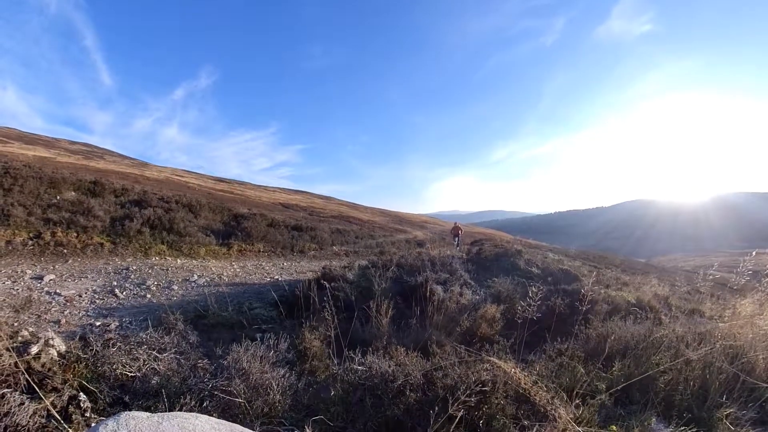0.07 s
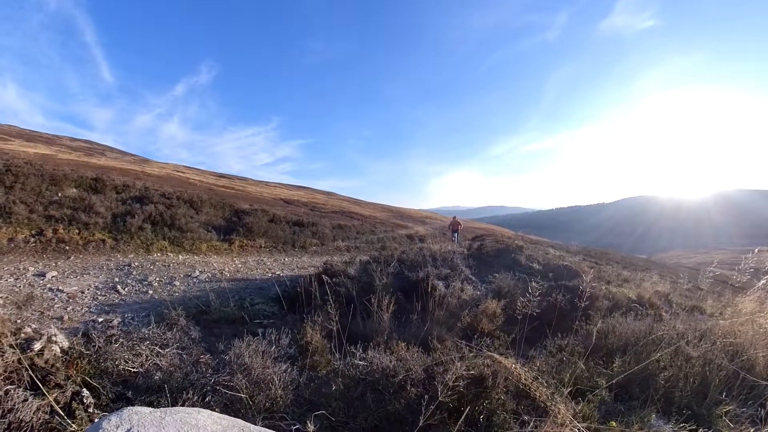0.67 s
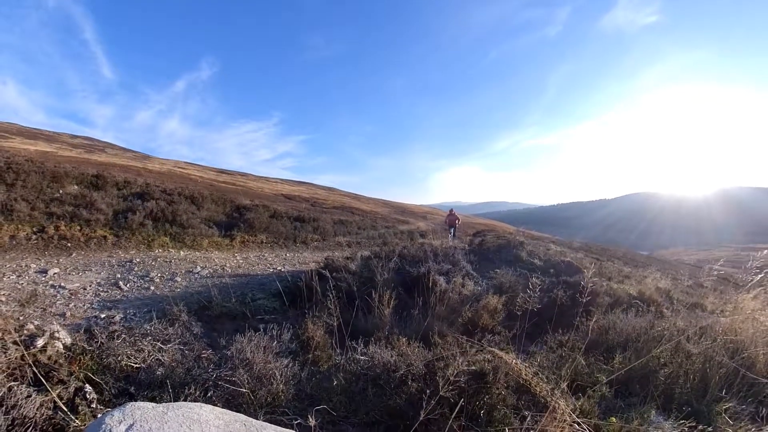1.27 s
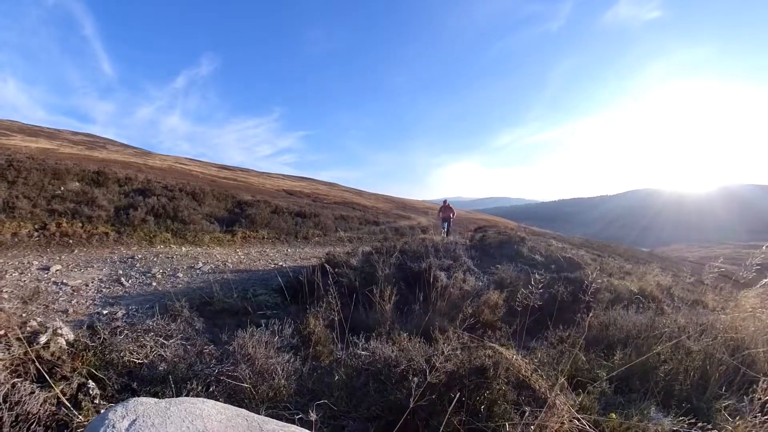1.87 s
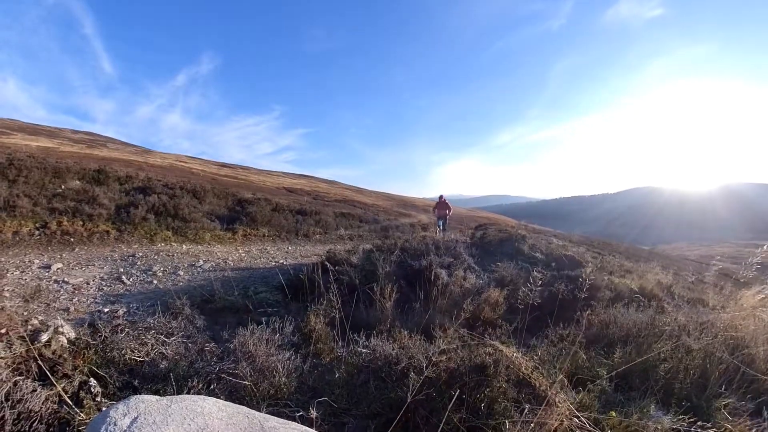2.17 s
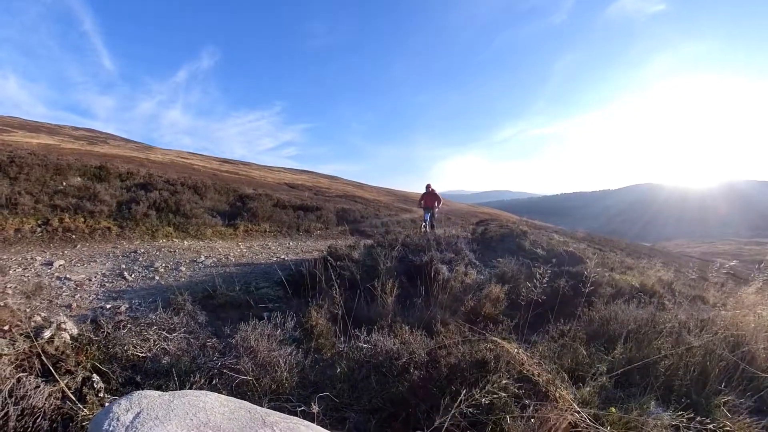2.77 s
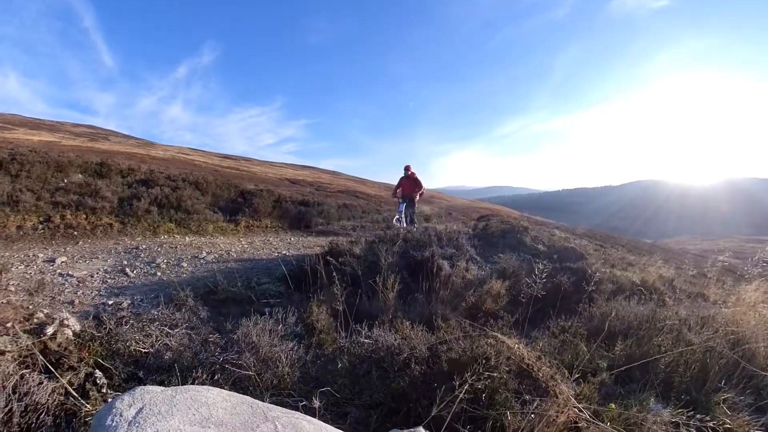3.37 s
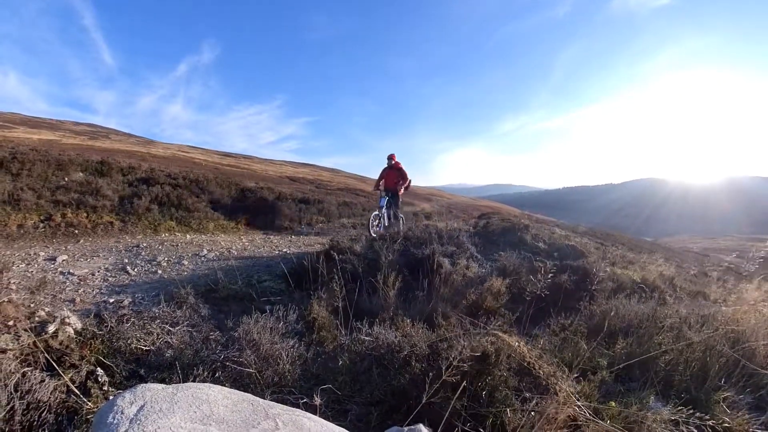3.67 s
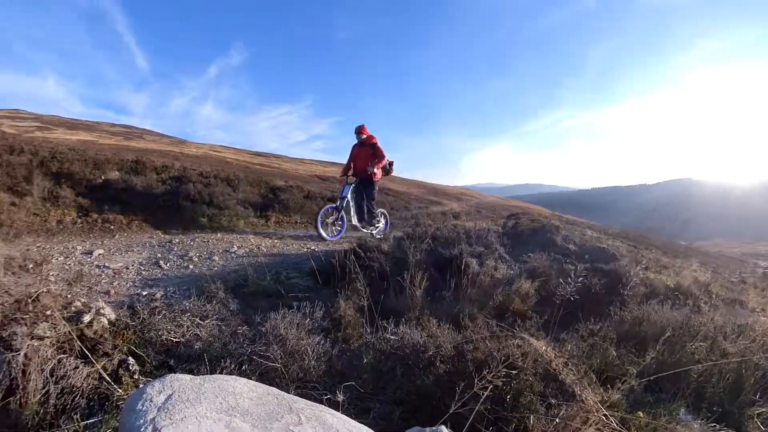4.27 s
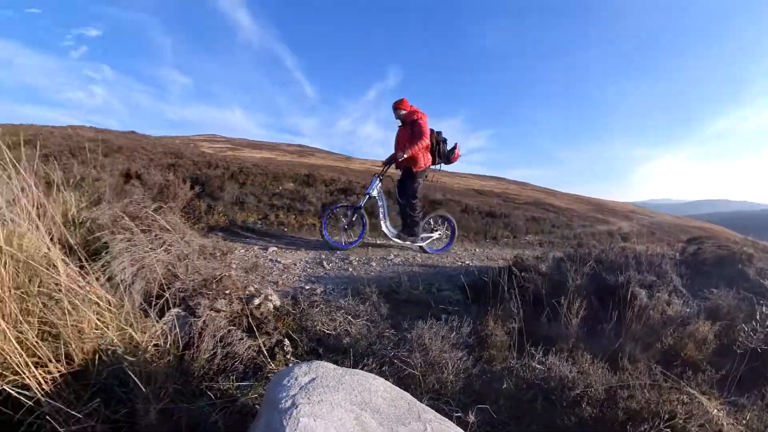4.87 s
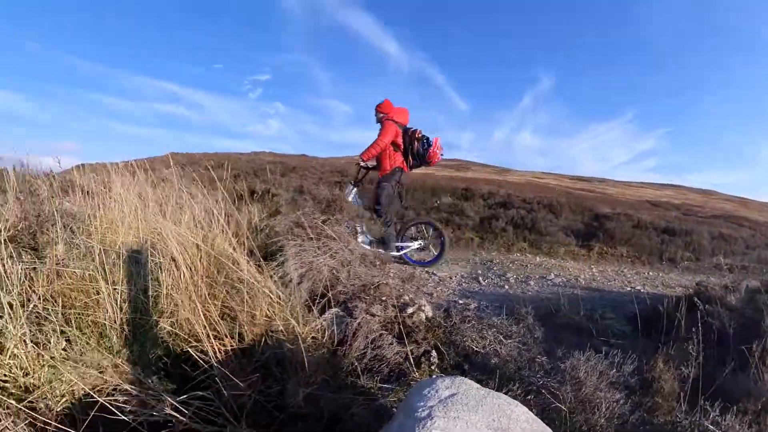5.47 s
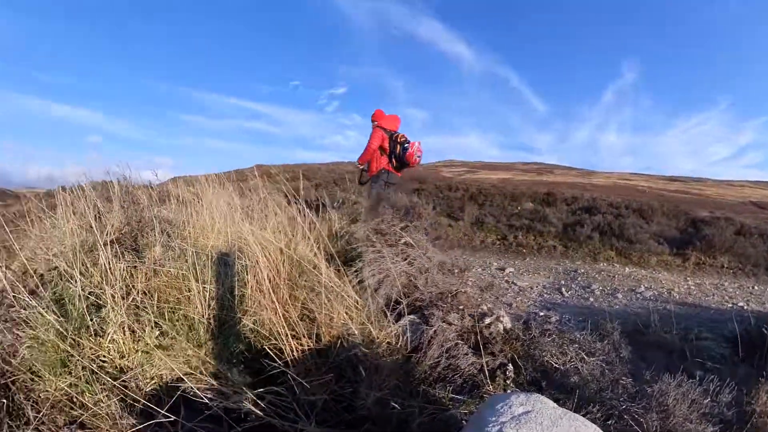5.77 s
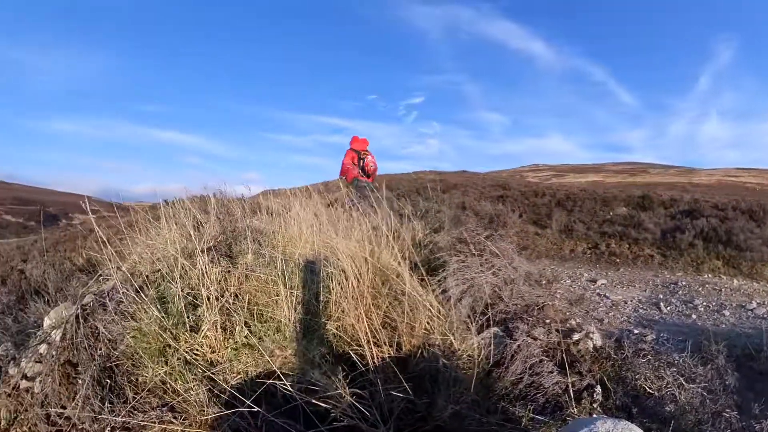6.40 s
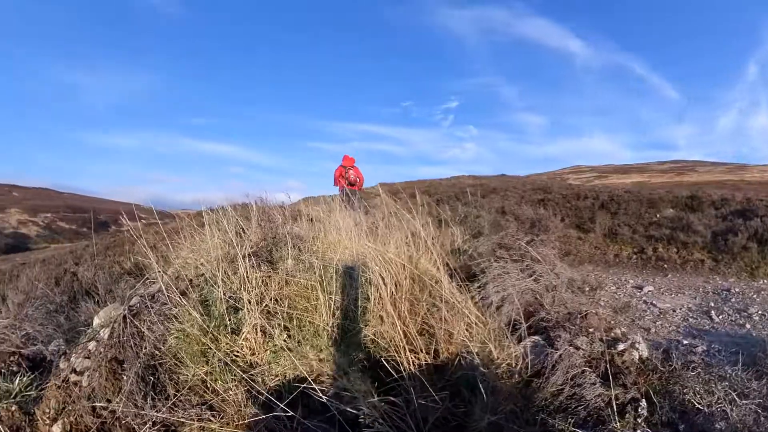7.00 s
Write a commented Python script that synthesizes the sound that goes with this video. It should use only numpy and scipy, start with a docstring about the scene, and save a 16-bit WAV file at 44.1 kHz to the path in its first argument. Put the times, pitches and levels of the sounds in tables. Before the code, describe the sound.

Wind thumps and rumbles on the microphone as scooter tyres approach over gravel, pass close and roll away.

```python
"""Kick scooter on windy gravel

A kick scooter rolls down a gravel track and passes a camera on an open hillside.
Its tyres crunch over packed stones, spray grit, flick stones and hum faintly when closest.
Gusts buffet the two microphone ports separately, over a deep rumble, with sharp pops
where an eddy hits one. Far air and a faint hiss lie underneath."""
import sys
import numpy as np
from scipy import signal
from scipy.fft import rfft, irfft
from scipy.io import wavfile
from scipy.ndimage import map_coordinates

SR = 44100
rng = np.random.default_rng(int(sys.argv[2]) if len(sys.argv) > 2 else 0)


def unload_wav(signal):
    """Save mono or channel-first audio to the path in sys.argv[1] as 16-bit WAV at rate SR, clipped to [-1, 1]."""
    wavfile.write(
        sys.argv[1],
        SR,
        np.round(np.clip(np.atleast_2d(signal).T, -1, 1) * 32767).astype(np.int16),
    )


N = 319284
TIME_S = np.arange(N) / SR
BINS_HZ = np.fft.rfftfreq(N, 1 / SR)
BAND_LIMIT_HZ = 9850
REF_GUST_DB = -50
CLOSEST_S, CLOSEST_M, SPEED_M_PER_S = 5.154, 2.83, 3.84

# scooter direction as the camera turns: (time [s], treble left minus right [dB], left port lag [s])
BEARING = [(2, -5, .00015), (3.2, -8, .00025), (4.2, -11, .00014), (4.9, -16, .00012), (5.15, -15, .00002),
           (5.4, -8.5, .00001), (5.7, -3.5, 0), (6.4, 3, 0), (7.24, 5, 0)]
# gravel sound at the ports: (frequency [Hz], left-right correlation [-1..1])
NEAR_CORRELATION = [(100, 1), (1000, 0.97), (1800, 0.75), (3200, 0.81), (5500, 0.61), (9800, 0.97)]


def amp(db):
    """Decibels to gain."""
    return 10 ** (np.asarray(db) / 20)


def unit(x):
    """Scale to rms 1."""
    return x / np.sqrt(np.mean(x ** 2) + 1e-20)


def at_hz(points, hz):
    """Interpolate a spectrum over log frequency."""
    points_hz, values = np.transpose(points)
    return np.interp(np.log(hz + 1), np.log(points_hz + 1), values)


def follow(rows):
    """Interpolate each column of a time table to every sample."""
    times_s, *columns = np.transpose(rows)
    return [np.interp(TIME_S, times_s, column) for column in columns]


def add(mix, start_s, sound):
    """Mix a sound in at start_s."""
    part = mix[..., max(round(start_s * SR), 0):][..., :sound.shape[-1]]
    part += sound[..., :part.shape[-1]]


def drift(cutoff_hz):
    """Low-passed random wander, rms 1."""
    return unit(irfft(rfft(rng.standard_normal(N)) * np.exp(-(BINS_HZ / cutoff_hz) ** 2), N))


def stereo(pair, colour, correlation):
    """Blend two independent signals into a coloured, partly correlated left and right."""
    a, b = rfft(pair)
    shared = np.clip(at_hz(correlation, BINS_HZ), -1, 1)
    spectra = np.array([a, shared * a + np.sqrt(1 - shared ** 2) * b])
    return unit(irfft(spectra * amp(at_hz(colour, BINS_HZ)), N))


def puff(peak_s, peak_db, length_s, rise_share=0.49, edge_db=-17.5):
    """Gain of one puff of air: linear rise and fall in dB."""
    away = np.maximum((peak_s - TIME_S) / rise_share, (TIME_S - peak_s) / (1 - rise_share)) / length_s
    gain, near = np.zeros(N), away < 4
    gain[near] = amp(peak_db + edge_db * away[near])
    return gain


def airflow_db(port):
    """Breeze plus gusts at one port (0 left, 1 right), summed in power."""
    # (time [s], left [dB], right [dB])
    breeze = [(0, -74, -68.5), (.8, -92, -84.5), (1.2, -67, -69.5), (2.1, -102, -83.5), (2.6, -63, -78),
              (3.1, -78, -91), (3.5, -79, -72), (3.75, -84, -59), (4.15, -67, -54.5), (4.45, -81, -71),
              (5, -72.5, -52), (5.7, -71, -71.5), (6.1, -76, -65.5), (6.45, -83, -74.5), (7.24, -72, -60)]
    # (peak time [s], left [dB], right [dB], length [s])
    gusts = [(0.262, -78, -48.5, 0.22), (0.605, -76, -56, 0.23), (1.028, -54, -51.5, 0.1),
             (1.303, -61, -58, 0.078), (1.603, -58.5, -52, 0.097), (1.76, -55, -58.5, 0.073),
             (1.84, -68, -64, 0.24), (2.275, -61, -55, 0.19), (2.376, -36.5, -43.5, 0.12),
             (2.472, -49, -64, 0.046), (2.622, -67, -50, 0.23), (2.737, -32, -49, 0.075),
             (2.815, -27, -41.5, 0.084), (2.914, -29, -44, 0.076), (2.97, -31.5, -51, 0.11),
             (3.299, -72, -45, 0.17), (3.4, -48, -42.5, 0.043), (3.612, -74, -48.5, 0.11),
             (4.017, -78, -60, 0.16), (4.13, -54.5, -54, 0.23), (4.26, -74, -48, 0.055),
             (4.689, -46.5, -45.5, 0.22), (4.8, -42, -50, 0.024), (4.86, -30.5, -69, 0.081),
             (5.4, -63, -42, 0.14), (5.499, -43.5, -64, 0.092), (5.795, -66, -51.5, 0.27),
             (5.871, -56, -37.5, .06), (6.533, -52, -44.5, 0.021), (6.681, -61, -53, 0.16),
             (6.814, -44.5, -73, 0.073), (6.884, -42, -44, 0.09), (7.124, -82, -38, 0.069),
             (7.213, -78, -56, 0.098)]
    power = amp(follow(breeze)[port]) ** 2
    for peak_s, *port_db, length_s in gusts:
        power += puff(peak_s, port_db[port], length_s) ** 2
    return 10 * np.log10(power)


def buffet(air_db, eddies_per_s, spread_db, db_per_octave, trim_db):
    """Turbulence at a port is a hail of eddies; faster air is louder, with smaller, higher ones."""
    # spectrum at REF_GUST_DB: (frequency [Hz], relative density [dB])
    turbulence = [(20, -41), (60, -18), (130, -6), (250, 2), (450, 1.5), (750, -5.5), (1100, -15),
                  (1600, -25.5), (2300, -61), (4000, -89)]
    excess_db = air_db - REF_GUST_DB
    # strong gusts flutter less and pack their eddies closer
    flutter_db = 5.0 * np.clip(drift(40), -2, 1.3) * np.clip(.8 - excess_db / 10, .45, 1)
    crowding = amp(np.clip(excess_db, 0, 12))
    sizes = amp(spread_db * np.minimum(rng.exponential(1, N), 3.5)) * rng.choice([-1, 1], N)
    hits = rng.random(N) < eddies_per_s * crowding / SR
    hail = unit(sizes * hits / np.sqrt(crowding) * amp(flutter_db))
    hz, frames_s, spectra = signal.stft(hail, SR, nperseg=1024, noverlap=768)
    pitch_ratio = 2 ** (np.interp(frames_s, TIME_S, excess_db) / db_per_octave)
    colour = amp(at_hz(turbulence, hz[:, None] / pitch_ratio))
    colour /= np.sqrt(np.mean(colour ** 2, axis=0))
    wind = signal.istft(spectra * colour, SR, nperseg=1024, noverlap=768)[1][:N]
    return amp(air_db + trim_db) * wind


def eddy_pops(pitch_ratio, roundness, swirl_db, swirl_s, trim_db):
    """An eddy crossing a port: one push and pull of pressure in a brief swirl of weaker ones."""
    # (time [s], level before trim [dB], centre before pitch_ratio [Hz], port [0 left, 1 right])
    eddies = [(0.04, -38, 454, 1), (0.252, -36, 620, 1), (0.266, -32, 630, 1), (0.317, -24, 972, 1),
              (0.593, -30.5, 630, 1), (1.052, -30.5, 596, 1), (1.087, -38, 413, 1), (2.197, -39.5, 630, 1),
              (2.298, -38, 513, 0), (2.344, -32.5, 710, 0), (2.373, -22, 760, 0), (2.387, -30, 630, 0),
              (2.621, -27.5, 730, 1), (2.745, -26, 920, 0), (2.784, -35, 710, 1), (2.801, -20, 870, 0),
              (2.801, -18, 875, 1), (2.809, -11, 830, 0), (2.817, -19.5, 900, 0), (2.838, -23, 710, 0),
              (2.91, -22, 730, 0), (2.926, -21, 860, 0), (2.955, -26, 694, 0), (2.97, -19.5, 810, 0),
              (2.985, -25, 740, 0), (3.29, -34, 655, 1), (3.298, -28.5, 710, 1), (3.38, -33, 665, 1),
              (3.417, -33, 680, 1), (3.603, -34, 600, 1), (3.966, -39, 530, 1), (4.041, -33, 744, 1),
              (4.252, -30.5, 700, 1), (4.717, -14.5, 780, 1), (4.804, -27.5, 560, 0), (4.852, -28, 910, 0),
              (4.867, -18, 840, 0), (5.403, -40, 590, 1), (5.423, -22.5, 920, 1), (5.476, -32, 530, 0),
              (5.801, -30, 570, 1), (5.817, -33, 644, 1), (5.874, -16, 840, 1), (6.622, -39, 347, 1),
              (6.798, -34, 590, 0), (6.885, -34, 456, 0), (7.132, -23.5, 840, 1)]
    out, t = np.zeros((2, N)), np.arange(-1024, 1024) / SR
    for time_s, level_db, hz, port in eddies:
        pulse = (1 - 2j * np.pi * hz * pitch_ratio * t / roundness) ** -roundness
        pop = (pulse * np.exp(2j * np.pi * rng.random())).real
        swirl = unit(signal.fftconvolve(rng.standard_normal(len(t)), pop, "same"))
        swirl *= amp(swirl_db) * np.exp(-abs(t) / swirl_s)
        eddy = (pop + swirl) * signal.windows.tukey(len(t))
        add(out[port], time_s + t[0], amp(level_db + trim_db) * eddy)
    # treble lift, then a cut where eddies smaller than the port cancel: (frequency [Hz], gain [dB])
    port_response = [(1400, -1.0), (2200, 6.5), (3200, 18.5), (5000, -50)]
    return irfft(rfft(out) * amp(at_hz(port_response, BINS_HZ)), N)


def rumble(air_db, lump_db, level_at_ref_db, db_per_air_db):
    """Deep wind grows with the airflow and reaches both ports alike, in soft lumps."""
    # pressure on the whole camera: (peak time [s], level [dB], length [s])
    swells = [(1.07, -68, .24), (1.6, -65, .36), (1.8, -61.5, .28), (2.39, -66, .36), (2.89, -68, .4),
              (7.22, -70, .3)]
    # (frequency [Hz], relative density [dB])
    colour = [(12, -13), (30, -12.5), (50, -10.5), (110, -4), (190, -2), (350, -9.5), (1000, -77)]
    power = amp(level_at_ref_db + db_per_air_db * (air_db - REF_GUST_DB)) ** 2
    power += sum(puff(*swell) ** 2 for swell in swells)
    lumps = unit(amp(lump_db * np.clip(drift(30), -2, 1.5)))
    noise = lumps * rng.standard_normal((2, N))
    return np.sqrt(power) * stereo(noise, colour, correlation=[(30, 1.0), (200, 1.0)])


def background(valley_db, hiss_db):
    """Far air over the hills and steady microphone hiss."""
    # both: (frequency [Hz], relative density [dB])
    valley_colour = [(20, -34), (100, -7.5), (300, 6), (620, 2), (880, 1), (1200, -0.5), (1700, 0.5),
                     (2600, -1.5), (3800, -2), (6000, -12), (10000, -19.5)]
    hiss_colour = [(1500, -21.5), (3500, -8), (5500, 1), (8000, 3), (9700, 2.5)]
    # (frequency [Hz], left-right correlation [-1..1])
    correlation = [(60, -0.14), (500, 0.64), (1100, 0.94), (2300, -0.46), (3400, -0.54), (4700, -0.23),
                   (6500, 1), (9000, 1)]
    valley = stereo(rng.standard_normal((2, N)), valley_colour, correlation)
    hiss = stereo(rng.standard_normal((2, N)), hiss_colour, correlation)
    return amp(valley_db) * valley + amp(hiss_db) * hiss


def distance_m():
    """Camera to scooter on a straight pass."""
    return np.hypot(CLOSEST_M, SPEED_M_PER_S * (TIME_S - CLOSEST_S))


def passing_db(loss_db_per_m, bank_db, bank_s=5.94, fade_s=0.18):
    """Level re the closest point: spreading, absorption by heather, shade of a grassy bank."""
    range_m = distance_m()
    hidden = .5 + .5 * np.tanh((TIME_S - bank_s) / fade_s)
    return 20 * np.log10(CLOSEST_M / range_m) - loss_db_per_m * (range_m - CLOSEST_M) + bank_db * hidden


def grains(per_s, spread_db):
    """Two trains of stone contacts: many small, a few large."""
    sizes = amp(spread_db * np.minimum(rng.exponential(1, (2, N)), 4))
    return sizes * rng.standard_normal((2, N)) * (rng.random((2, N)) < per_s / SR)


def speckle(contacts, depth_db, width_bins, length_frames):
    """Random brief boosts and dips in narrow bands give the gravel noise a patchy, grainy texture."""
    spectra = signal.stft(contacts, SR, nperseg=512, noverlap=384)[2]
    frames, bins = np.arange(-12, 13), np.arange(-12, 13)[:, None]
    patch = np.exp(-(frames / length_frames) ** 2 - (bins / width_bins) ** 2)
    patches = unit(signal.fftconvolve(rng.standard_normal(spectra.shape[1:]), patch, "same"))
    return unit(signal.istft(spectra * amp(depth_db * patches), SR, nperseg=512, noverlap=384)[1][:, :N])


def crunch(clump_db, closest_db):
    """Packed stones slip in clumps under the wheels."""
    # (frequency [Hz], relative density [dB])
    colour = [(60, -23.5), (200, -5), (500, 3.5), (750, 1), (900, 4.5), (1150, 3), (1500, 3.5), (2200, 1),
              (2900, -3), (3800, -10), (6000, -16)]
    level_db = closest_db + passing_db(loss_db_per_m=1.1, bank_db=-6.0)
    contacts = stereo(grains(per_s=3900, spread_db=-1.0), colour, NEAR_CORRELATION)
    gravel = speckle(contacts, depth_db=3.3, width_bins=0.75, length_frames=5.5)
    clumps = unit(amp(clump_db * drift(32)))
    return amp(level_db) * clumps * gravel


def tread_hum(flutter_db, trim_db, near_waver=.011, far_waver=.03):
    """Tread blocks ring the tyre; the harmonics waver on rough ground, most from afar."""
    # (time [s], block rate [Hz], level before trim [dB], harmonics 5 and 6 re 4 [dB])
    tread = [(0, 208, -89, -2), (.9, 199, -86, -2), (1.4, 208, -82, -5), (2.3, 206, -83, -7),
             (3.2, 216, -82, -7), (4.85, 236, -79, -14), (4.93, 233, -66, -18), (4.99, 228, -64, -18),
             (5.03, 226, -70, -18), (5.09, 227, -63, -18), (5.18, 235, -65, -16), (5.28, 231, -79, -4),
             (5.5, 238, -75, 4), (5.6, 229, -65, -11), (5.68, 223, -74, -4), (5.85, 222, -95, -6)]
    block_hz, level_db, upper_db = follow(tread)
    waver = far_waver + (near_waver - far_waver) * CLOSEST_M / distance_m()
    phase = 2 * np.pi * np.cumsum(block_hz * (1 + waver * drift(60))) / SR
    lowest, *upper = [amp(flutter_db * np.clip(drift(30), -2, 1)) * np.sin(k * phase) for k in (4, 5, 6)]
    return amp(level_db + trim_db) * (lowest + amp(upper_db) * sum(upper))


def lag_left_port(sound):
    """Long waves from the side bend round the camera and reach the left port late."""
    _, lag_s = follow(BEARING)
    left = map_coordinates(sound[0], [(TIME_S - lag_s) * SR], order=5)
    return np.array([left, sound[1]])


def grit(near_clump_db, far_clump_db, closest_db):
    """Bright spurts of grit, more fitful from afar; the camera body shades the far port."""
    # (frequency [Hz], relative density [dB])
    colour = [(1200, -29), (2800, -4.5), (4000, -4.5), (5200, -0.5), (6500, -2), (8000, -2.5), (9700, -4)]
    away_db = passing_db(loss_db_per_m=0.62, bank_db=-4)
    contacts = stereo(grains(per_s=3200, spread_db=1.2), colour, NEAR_CORRELATION)
    spray = speckle(contacts, depth_db=2.8, width_bins=1.8, length_frames=4)
    pan_db, _ = follow(BEARING)
    sides = amp([pan_db / 2, -pan_db / 2])
    sides /= np.sqrt(np.mean(sides ** 2, axis=0))
    clump_db = far_clump_db + (near_clump_db - far_clump_db) * amp(away_db / 2)
    spurts_db = clump_db * np.clip(drift(18), -2.5, 2.5)
    return amp(closest_db + away_db + spurts_db) * sides * spray


def flicked_stones(rise_s, t60_s, width_share, trim_db):
    """A flicked stone scrapes loose, then chatters briefly around its own pitch."""
    # (time [s], level before trim [dB], ring [Hz], left minus right [dB])
    stones = [(3.159, -59.5, 10000, -20), (3.474, -61.5, 6200, -18), (3.709, -59, 7300, -16),
              (3.8003, -57, 6100, -20), (3.925, -49.5, 5060, -11), (4.156, -57, 7700, -11),
              (4.345, -55.5, 5560, -12), (4.559, -54, 9850, -15), (4.659, -38.5, 1520, -3),
              (4.7238, -57, 5200, -26), (4.8237, -53.5, 8000, -15), (5.6063, -50, 4000, -7),
              (5.6868, -51, 7600, -8), (5.7793, -53, 8600, -7)]
    out, t = np.zeros((2, N)), np.arange(-1024, 3072) / SR
    hz = np.fft.rfftfreq(len(t), 1 / SR)
    envelope = np.exp(np.minimum(t, 0) / rise_s) * amp(-60 * np.maximum(t, 0) / t60_s)
    for time_s, level_db, ring_hz, pan_db in stones:
        band = np.exp(-((hz / ring_hz - 1) / width_share) ** 2) * (hz < BAND_LIMIT_HZ)
        chatter = unit(irfft(rfft(rng.standard_normal(len(t))) * band)) * envelope
        sides = amp([[pan_db / 2], [-pan_db / 2]])
        add(out, time_s + t[0], amp(level_db + trim_db) * sides * chatter)
    return out


def scene():
    """Wind on the ports, the hillside and the passing scooter."""
    left_db, right_db = airflow_db(port=0), airflow_db(port=1)
    left = buffet(left_db, eddies_per_s=600, spread_db=6.0, db_per_octave=25.5, trim_db=0)
    right = buffet(right_db, eddies_per_s=450, spread_db=5.0, db_per_octave=29.5, trim_db=1.9)
    pops = eddy_pops(pitch_ratio=0.96, roundness=4.8, swirl_db=-18.5, swirl_s=0.0044, trim_db=3)
    deep = rumble((left_db + right_db) / 2, lump_db=8, level_at_ref_db=-79, db_per_air_db=.55)
    wind = np.array([left, right]) + pops + deep
    tyres = crunch(clump_db=2.5, closest_db=-56.5) + tread_hum(flutter_db=6.0, trim_db=2)
    spray = grit(near_clump_db=1.9, far_clump_db=2.5, closest_db=-59.5)
    flicks = flicked_stones(rise_s=0.0031, t60_s=.04, width_share=.22, trim_db=-8)
    return wind + background(valley_db=-76.5, hiss_db=-75.5) + lag_left_port(tyres) + spray + flicks


def record(dry):
    """Low cut and band limit."""
    low_cut = signal.butter(2, 34, "highpass", fs=SR, output="sos")
    band_limit = signal.firwin(511, BAND_LIMIT_HZ, window=("kaiser", 9), fs=SR)
    return signal.oaconvolve(signal.sosfilt(low_cut, dry), band_limit[None], "same")


dry = scene()
out = record(dry)
unload_wav(out)
```